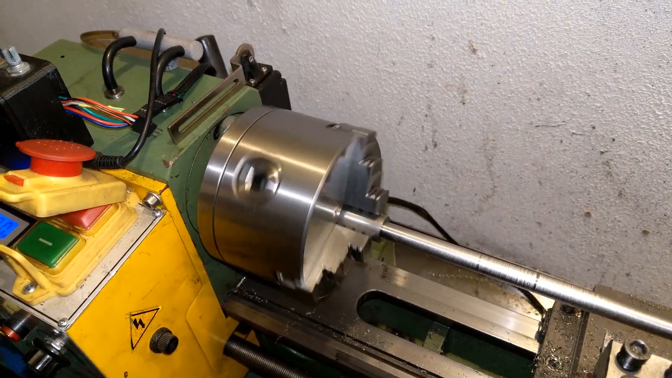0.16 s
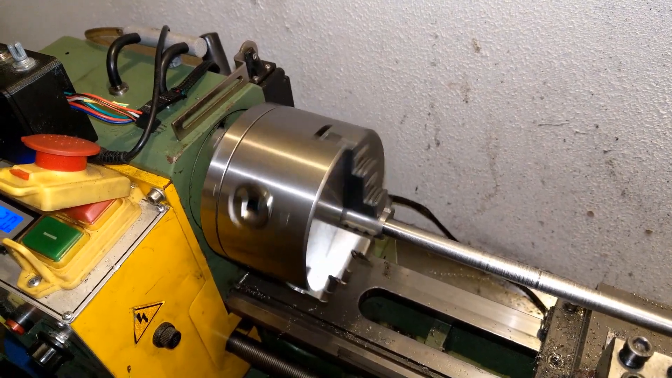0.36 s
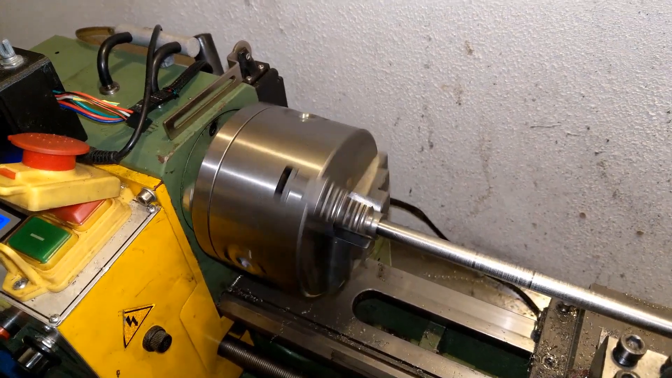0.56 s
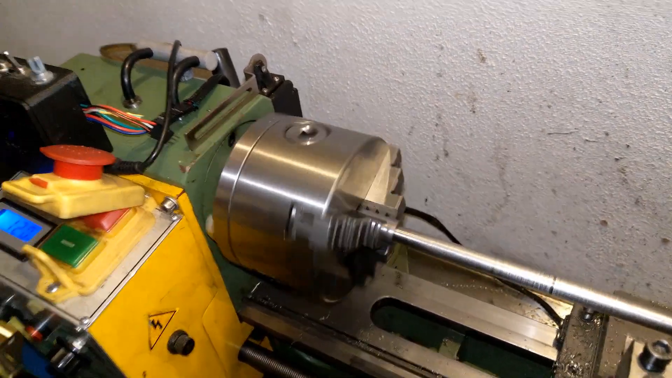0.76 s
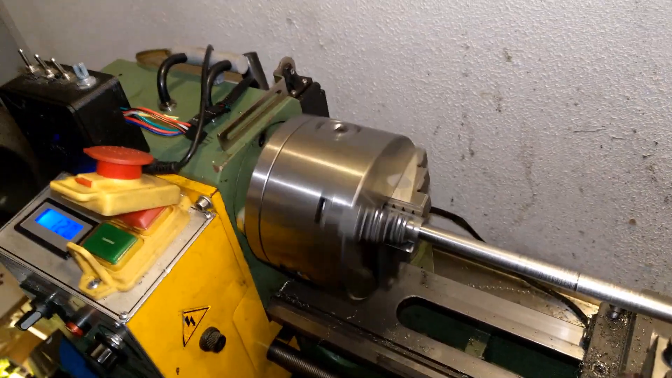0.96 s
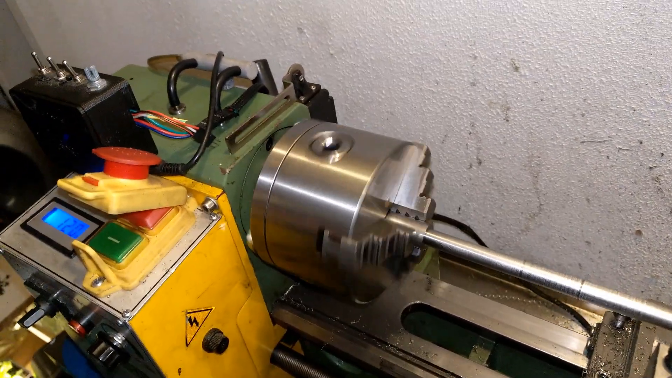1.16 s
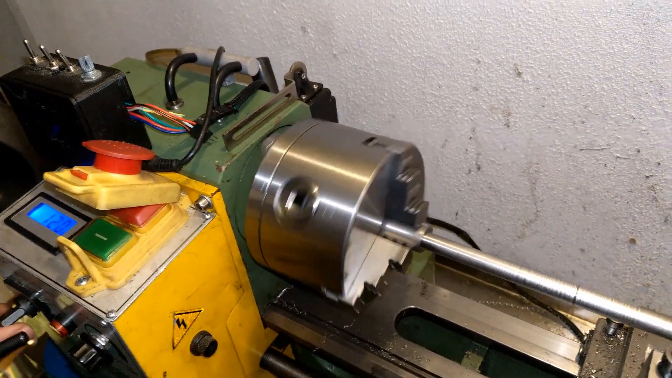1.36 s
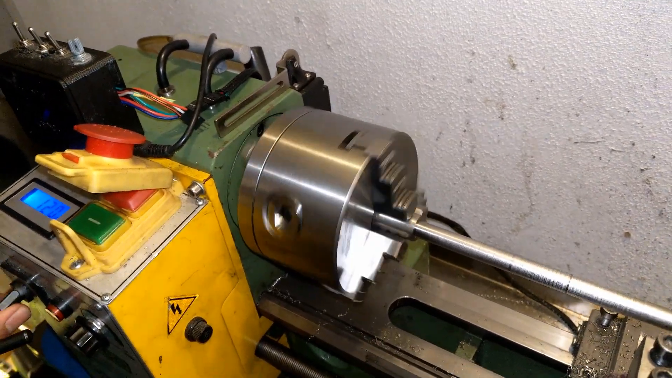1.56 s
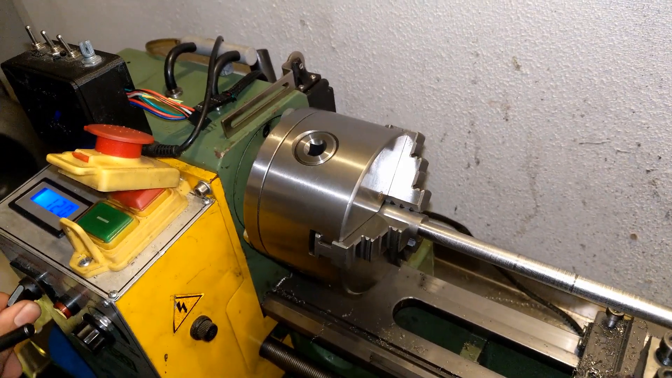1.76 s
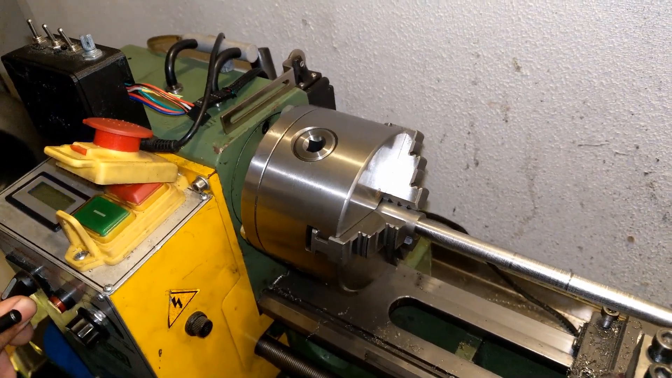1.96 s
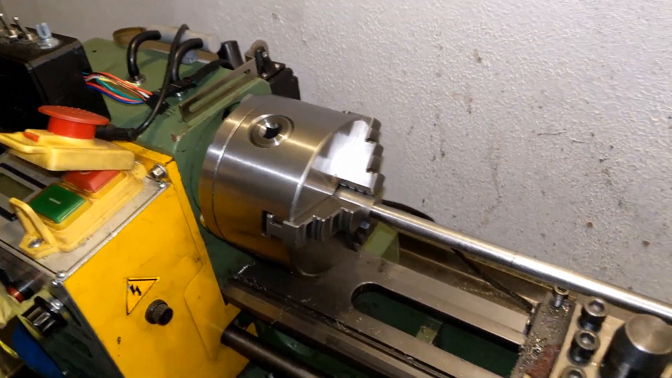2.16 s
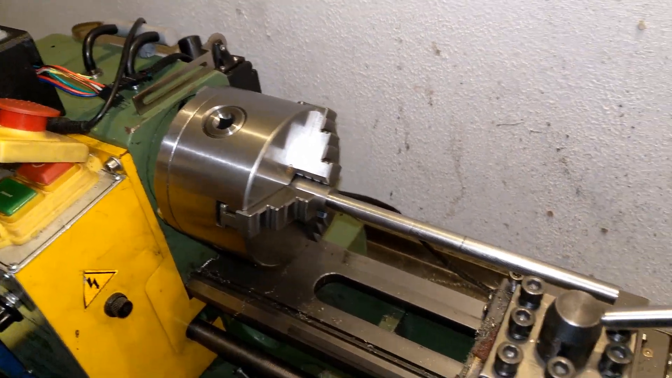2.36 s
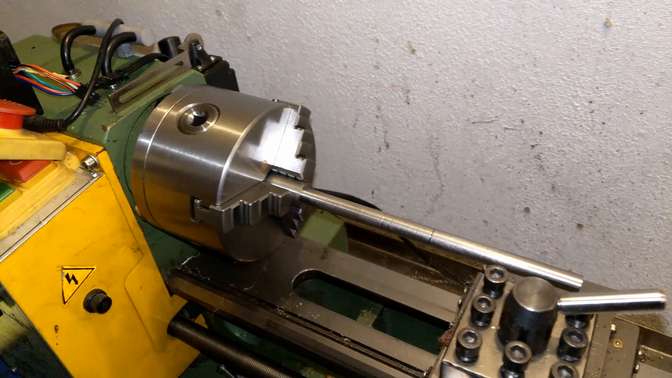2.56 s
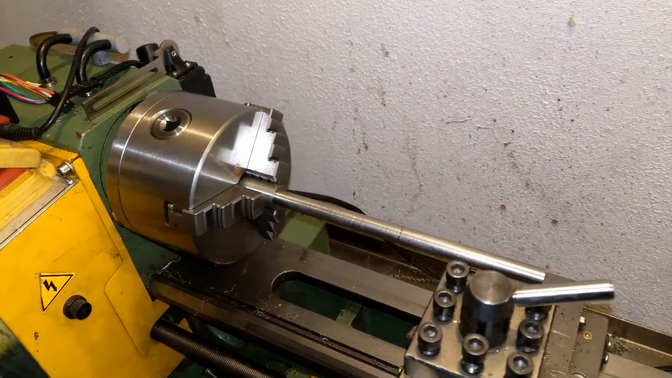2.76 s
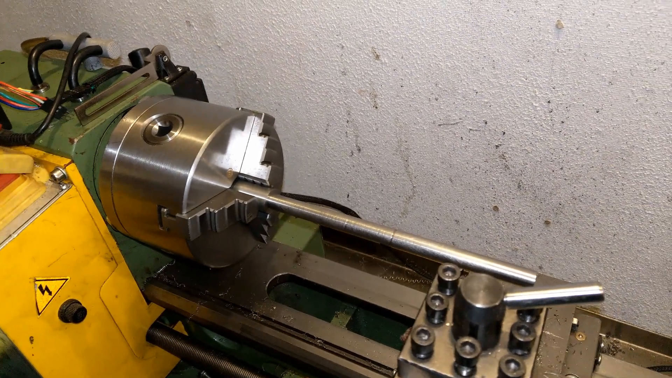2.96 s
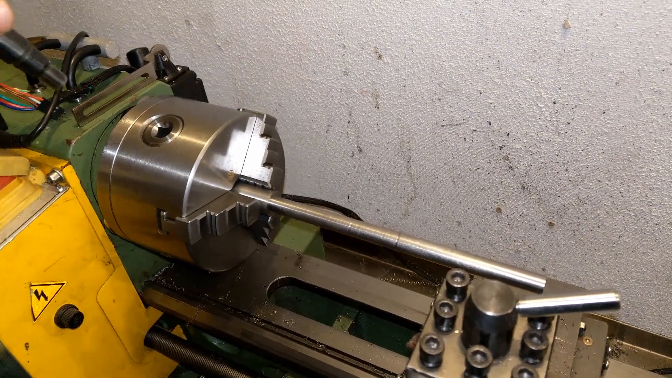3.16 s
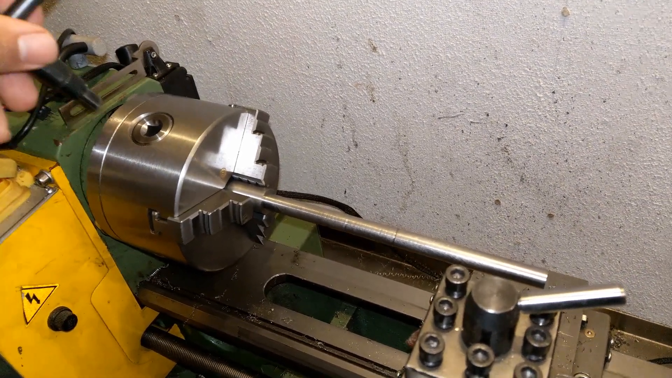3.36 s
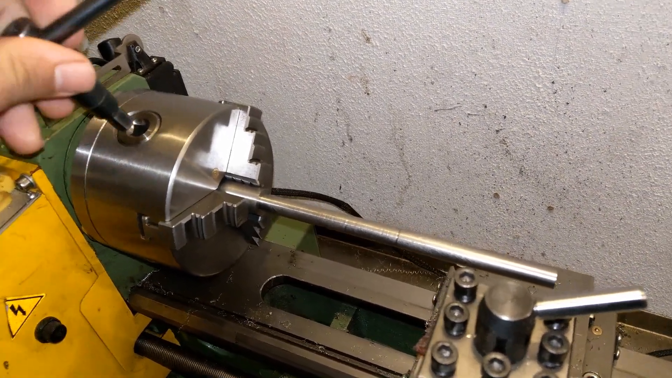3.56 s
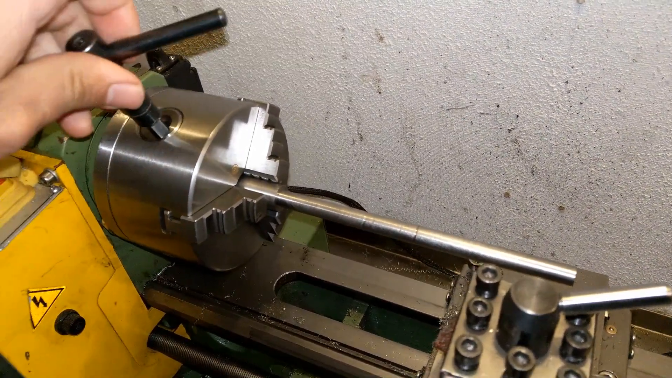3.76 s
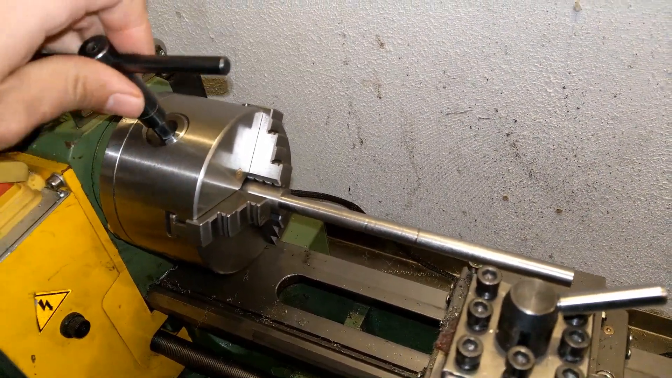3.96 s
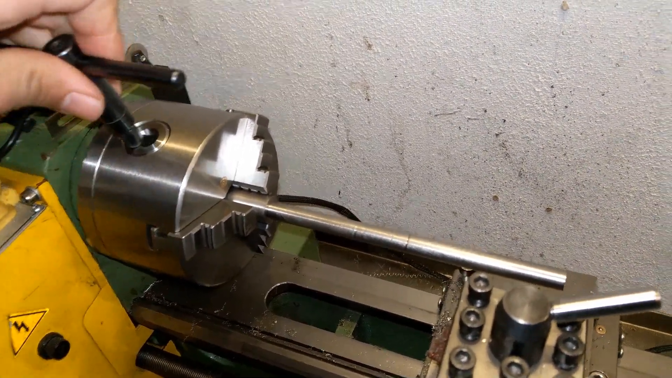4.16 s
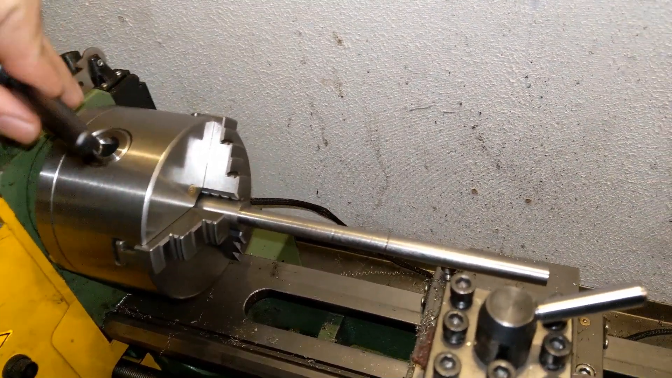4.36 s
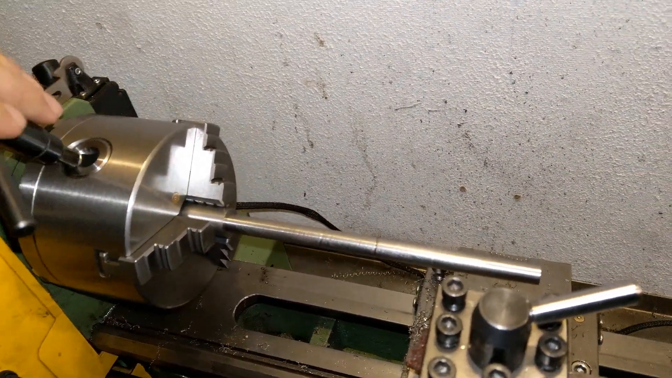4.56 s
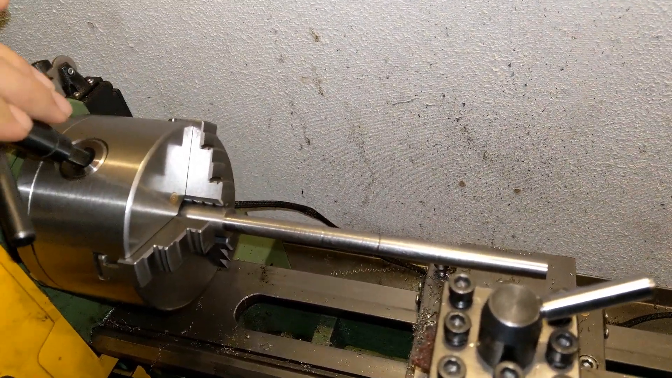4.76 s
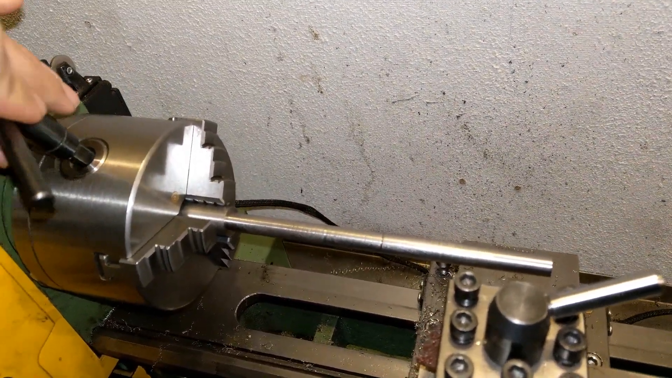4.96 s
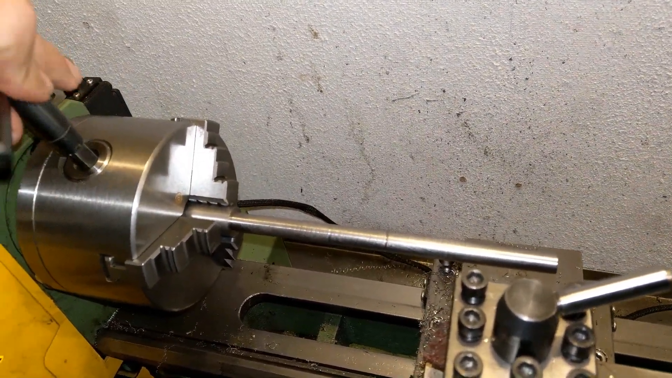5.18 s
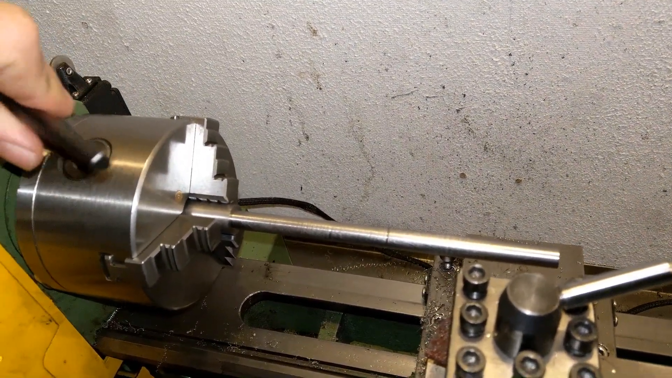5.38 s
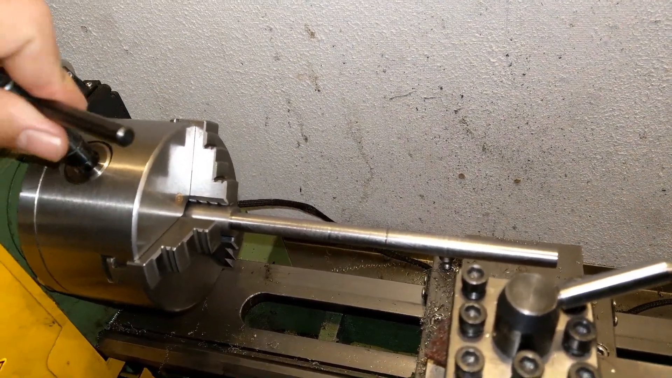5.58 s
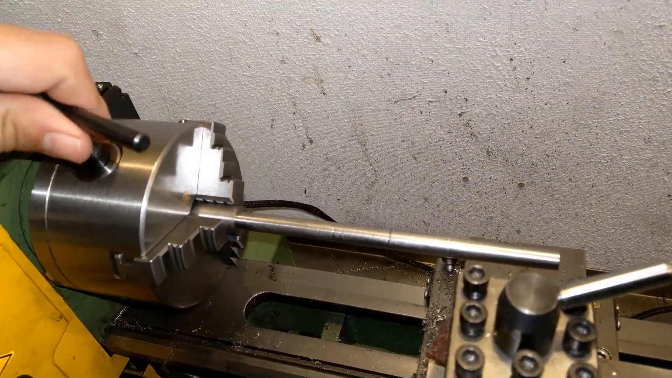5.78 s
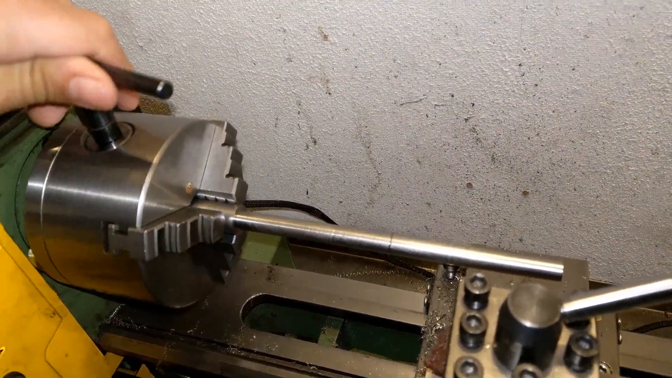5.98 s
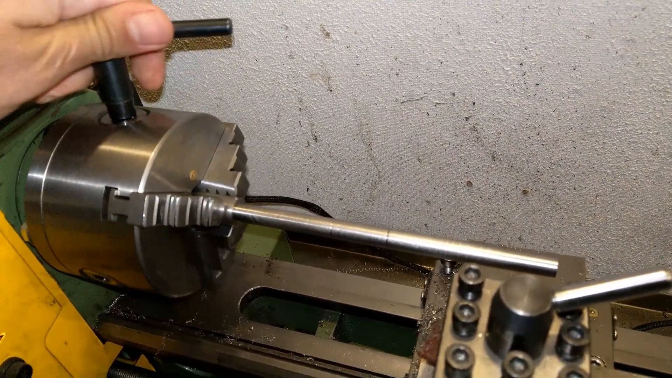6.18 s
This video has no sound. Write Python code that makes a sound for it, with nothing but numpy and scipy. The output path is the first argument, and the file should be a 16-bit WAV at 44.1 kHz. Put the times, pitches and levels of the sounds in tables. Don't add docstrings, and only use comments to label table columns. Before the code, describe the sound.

A small metal lathe runs close by with a low pulsing hum, gear whirr and faint brush hiss, while dull handling bumps jolt the microphone. A loud switch snap cuts the power; the motor sinks away within moments with a hard clack. In the quiet room, with faint fan and hiss, a steel key then ticks, clicks and knocks against the chuck, briefly ringing the heavy machine bed.

```python
import sys
import numpy as np
from scipy import signal
from scipy.fft import rfft, irfft, next_fast_len
from scipy.io import wavfile
from scipy.ndimage import uniform_filter1d, map_coordinates

SR = 44100
rng = np.random.default_rng(int(sys.argv[2]) if len(sys.argv) > 2 else 0)


def gain_from_db(level_db):
    decades = np.asarray(level_db, float) / 20
    return 10 ** decades


def output_pcm(signal):
    pcm = np.clip(np.atleast_2d(signal).T, -1, 1) * 32767
    wavfile.write(sys.argv[1], SR, np.round(pcm).astype(np.int16))


N = 274467

# (frequency [Hz], likeness [-1 to 1])
NEAR_LIKENESS = [(60, 0.78), (180, 0.94), (540, 0.8), (1630, 0.89), (4880, -0.061), (14700, 0.068)]
OFF_S = 1.79
USUAL_DB = -42
TOP_HZ = 14330


def unit(x):
    return x / np.sqrt(np.mean(x ** 2) + 1e-20)


def along(points, hz):
    f, v = np.transpose(points)
    return np.interp(np.log(hz + 1), np.log(f + 1), v)


def curve(points):
    s, v = np.transpose(points)
    return np.interp(np.arange(N) / SR, s, v)


def wobble(rate):
    t = np.arange(0, N + 128, 128) / SR
    knots = rng.standard_normal(400)
    return np.interp(np.arange(N) / SR, t, map_coordinates(knots, [t * min(rate, 60)]))


def filtered(x, response):
    m = next_fast_len(x.shape[-1] + 2048)
    return irfft(rfft(x, m) * response(np.fft.rfftfreq(m, 1 / SR)), m)[..., :x.shape[-1]]


def resonant(modes):
    def response(f):
        total = 0
        for k, (hz, width, db) in enumerate(modes):
            peak = 1j * f * width / (hz * hz - f * f + 1j * f * width)
            total = total + (-1) ** k * gain_from_db(db) * peak
        return total
    return response


def rush(gain, alike, patchy_db):
    z = signal.stft(rng.standard_normal((2, N)), nperseg=512)[2]
    patches = uniform_filter1d(rng.standard_normal(z.shape[1:]), size=5, axis=0)
    patches = uniform_filter1d(patches, size=10, axis=1)
    pair = signal.istft(z * gain_from_db(patchy_db * unit(patches)), nperseg=512)[1][:, :N]

    def mid_and_side(hz):
        turn = np.arccos(np.clip(along(alike, hz), -1, 1)) / 2
        return gain(hz) * np.array([np.cos(turn), np.sin(turn)])
    mid, side = filtered(pair, mid_and_side)
    return unit(np.array([mid + side, mid - side]))


def coloured_rush(points, alike, patchy_db):
    return rush(lambda hz: gain_from_db(along(points, hz)), alike, patchy_db)


def tones(lines, width_hz, sway_db):
    peaks = lambda f: sum(gain_from_db(db) * np.exp(-((f - hz) / width_hz) ** 2) for hz, db in lines)
    total = np.sqrt(sum(gain_from_db(db) ** 2 for hz, db in lines))
    return total * gain_from_db(sway_db * wobble(7.6)) * unit(filtered(rng.standard_normal(N), peaks))


def steady(hz, drift_hz, sway_db):
    phase = 2 * np.pi * np.cumsum(hz + drift_hz * wobble(40)) / SR
    return np.sqrt(2) * gain_from_db(sway_db * wobble(12)) * np.sin(phase)


def cycle(hz, drift_hz):
    return 2 * np.pi * np.cumsum(hz + drift_hz * wobble(13)) / SR


def beat(phase, depth):
    return unit(np.exp(depth * np.cos(phase)))


def ringing(modes):
    return rush(lambda hz: np.abs(resonant(modes)(hz)) ** 2, NEAR_LIKENESS, patchy_db=2.5)


def motor():
    # (time [s], whirr level [dB])
    whirr_course = [
        (0.0, -50),
        (0.5, -52.5),
        (0.56, -46),
        (0.92, -52.5),
        (1.7, -52.5),
        (1.79, -45.5),
        (1.9, -62.5),
        (1.98, -58),
        (2.12, -99),
    ]
    whirr_db = curve(whirr_course + [(2.2, -110)])
    since_off = np.maximum(np.arange(N) / SR - OFF_S, 0)
    sag_hz_per_s = 130
    frame = cycle(np.maximum(82 - sag_hz_per_s * since_off, 30), drift_hz=3.33)
    return (frame_hum(frame, since_off) + running_tones(whirr_db) + casing_whirr(frame, whirr_db)
            + brush_hiss(whirr_db, since_off))


def frame_hum(frame, since_off):
    t = np.arange(N) / SR
    fade_db_per_s, shudder_at_s, shudder_s = 50, 1.845, 0.032
    shudder_db = 15 * np.exp(-((t - shudder_at_s) / shudder_s) ** 2)
    level_db = -40.5 + shudder_db - fade_db_per_s * since_off
    turn_s, dip_s, depth = 0.13, 0.05, 0.42
    dips = 1 - depth * (t < OFF_S) * np.cos(2 * np.pi * (t - dip_s) / turn_s)
    return gain_from_db(level_db - 0.5) * dips * np.sin(frame)


def running_tones(whirr_db):
    # (frequency [Hz], rms level [dB])
    steady_tones = [(150, -61.5), (227, -68), (284, -75), (598, -65.5), (630, -63), (660, -70), (705, -67.5),
                    (829, -68), (861, -65.5), (900, -65.5), (990, -72)]
    bar_note_db = np.minimum(whirr_db, -52) - 11
    bar_note = gain_from_db(bar_note_db) * steady(425, drift_hz=5.04, sway_db=4)
    return gain_from_db(whirr_db + 52) * tones(steady_tones, width_hz=8, sway_db=0.9) + bar_note


def casing_whirr(frame, whirr_db):
    # (frequency [Hz], width [Hz], level [dB])
    casing_modes = [(136, 45, 5), (599, 60, -2.5), (755, 20, -7.5), (880, 82, 1), (986, 37, 2),
                    (1140, 210, -2.5)]
    cover_modes = [(1730, 130, -0.5), (1900, 62, 4), (2130, 180, -3)]
    guard_modes = [(3920, 420, -4), (4676, 620, -1.5), (6556, 810, -6)]
    # (frequency [Hz], level [dB per Hz])
    whirr_colour = [(59, -39), (100, -4), (255, -16.5), (425, -11.5), (526, -41), (638, -9), (1360, -22.5),
                    (1940, -14), (2320, -19), (4610, -29), (6800, -50), (8840, -76), (15000, -120)]
    cover = gain_from_db(-5 + 1.8 * wobble(18)) * beat(frame, depth=1.05) * ringing(cover_modes)
    belt = cycle(75, drift_hz=0.8)
    guard = gain_from_db(-8.5) * beat(belt, depth=0.18) * ringing(guard_modes)
    broad = gain_from_db(0.5) * coloured_rush(whirr_colour, NEAR_LIKENESS, patchy_db=-2.0)
    return gain_from_db(whirr_db - 2.5) * (ringing(casing_modes) + gain_from_db(-1.0) * cover + guard + broad)


def brush_hiss(whirr_db, since_off):
    # (frequency [Hz], level [dB per Hz])
    brush_colour = [(8000, -105), (8900, -17.5), (9380, -9.5), (10800, -3.5), (12300, -9.5), (13700, -8),
                    (14600, -7)]
    follows_whirr, fade_db_per_s = 0.4, 120
    level_db = -56.5 + follows_whirr * (whirr_db + 51.5) - fade_db_per_s * since_off
    bars = cycle(142, drift_hz=1.2)
    ride = gain_from_db(1.3 * wobble(40) + 0.9 * wobble(11)) * beat(bars, depth=0.55)
    return gain_from_db(level_db + 5.5) * ride * coloured_rush(brush_colour, NEAR_LIKENESS, patchy_db=1.5)


def switch():
    # (time [s], peak [dB], hardness [dB], rattle time to fall 60 dB [s])
    snaps = [
        (0.971, -47, -9, 0.036),
        (1.722, -23.5, -6.5, 0.044),
        (1.7842, -36.5, -2, 0.027),
        (1.929, -28, 0, 0.092),
        (2.0499, -52.5, -2.5, 0.079),
    ]
    # (frequency [Hz], width [Hz], level [dB])
    box_parts = [
        [(8800, 470, -9), (10360, 1000, 12.5), (12840, 3300, 5.5)],
        [(1616, 144, -1), (1960, 127, -0.5), (2630, 310, -3.5)],
        [(420, 58, -4), (660, 450, -11), (900, 135, -0.5), (1216, 56, 3), (1463, 86, -3)],
        [(3720, 630, 3.5), (5200, 390, 3), (6240, 690, -5)],
    ]
    return strikes(snaps, box_parts, rise=0.0016, blow=1.5)


def key():
    # (time [s], peak [dB], hardness [dB], rattle time to fall 60 dB [s])
    contacts = [(3.8197, -50.5, -4.5, 0.1), (3.837, -52.5, -6, 0.04), (4.0049, -67, -25, 0.057),
                (4.14, -43, -24, 0.12), (4.2247, -59.5, -11, 0.25), (4.6007, -69, -23, 0.057),
                (4.8429, -52.5, -44, 0.1), (4.8883, -50.5, -25, 0.074), (4.9143, -56.5, 8, 0.084),
                (4.928, -45.5, -6, 0.12), (4.9374, -50.5, -10, 0.13), (4.9471, -43.5, -7.5, 0.082),
                (5.1571, -39.5, -21, 0.14), (5.5403, -39.5, 0.5, 0.089), (5.6086, -59.5, -6.5, 0.14),
                (5.7656, -59, -1, 0.33), (5.7943, -36, 9.5, 0.027), (5.8181, -50.5, 5, 0.09),
                (6.2102, -58, 9, 0.43)]
    # (frequency [Hz], width [Hz], level [dB])
    steel_parts = [
        [(9820, 480, -13.5), (9900, 1900, -14), (10750, 2400, -24)],
        [(1620, 340, -4.5), (2070, 154, 3), (2480, 575, 0), (2940, 490, 0.5)],
        [(330, 126, 1.5), (480, 107, 3.5), (640, 100, -3.6), (824, 98, -3), (1103, 230, -6)],
        [(3770, 430, 3.5), (4780, 220, 2), (5580, 900, -5.5), (7760, 650, -10.5)],
    ]
    return strikes(contacts, steel_parts, rise=0.00061, blow=0.74)


def strikes(events, parts, rise, blow):
    out, t = np.zeros((2, N + SR)), np.arange(SR // 6) / SR
    s, db, bright_db, t60 = np.transpose(events)[:, :, None, None]
    body_db = 0.23 * (USUAL_DB - db)
    upper_db = 0.41 * bright_db
    rattle = gain_from_db(-60 * t / np.maximum(t60, 0.005))
    shape = (blow * gain_from_db(-60 * t / 0.0034) + rattle) * (1 - np.exp(-t / rise))
    shares_db = (bright_db, 0, body_db, upper_db)
    likeness = (0.7, 0.69, 1.0, 0.11)
    total = 0
    for modes, share_db, same in zip(parts, shares_db, likeness):
        left, other = np.moveaxis(rng.standard_normal((len(events), 2, len(t))) * shape, 1, 0)
        right = same * left + np.sqrt(abs(1 - same ** 2)) * other
        ring = filtered(np.stack([left, right], axis=1), resonant(modes))
        ring = ring / np.abs(ring).max(axis=(1, 2), keepdims=True)
        total = total + gain_from_db(db + share_db + 3.5) * ring
    for start, sound in zip(s.ravel(), total):
        out[:, round(start * SR):][:, :len(t)] += sound
    return out[:, :N]


def knocks():
    # (time [s], peak [dB], frequency [Hz], time to fall 60 dB [s])
    knock_notes = [(0.972, -29.5, 440, 0.017), (.972, -34, 900, 0.017), (1.722, -14.5, 954, 0.032),
                   (1.725, -32, 1074, 0.059), (1.933, -28.5, 353, 0.045), (1.934, -31.5, 620, 0.044),
                   (1.936, -28.5, 900, 0.064), (2.149, -68, 2920, .3), (3.823, -45.5, 227, 0.18),
                   (4.005, -54.5, 480, 0.15), (4.143, -34.5, 100, 0.15), (4.142, -44.5, 1627, 0.09),
                   (4.227, -52, 506, 0.34), (4.595, -54.5, 605, 0.17), (4.851, -45, 330, 0.093),
                   (4.949, -36.5, 229, 0.16), (4.955, -40.5, 420, 0.088), (5.156, -30, 101, 0.18),
                   (5.157, -38.5, 209, 0.15), (5.16, -38.5, 1620, 0.062), (5.162, -45, 1900, 0.06),
                   (5.158, -36, 1185, 0.038), (5.549, -36.5, 226.7, 0.31), (5.608, -35.5, 313, 0.15),
                   (5.745, -46, 224, 0.35), (5.799, -39, 235.4, 0.2), (5.8, -39.5, 438, 0.16),
                   (6.0, -52, 624, 0.098)]
    out, t = np.zeros(N + SR), np.arange(SR // 4) / SR
    for s, db, hz, t60 in knock_notes:
        swell_s = 0.033 * t60
        rough_rad = min(1.58 * gain_from_db(0.73 * (USUAL_DB - db)), 2.2)
        bend = rough_rad * np.interp(t, np.linspace(0, 0.25, num=36), rng.standard_normal(36))
        fade = gain_from_db(db + 2.5 - 60 * t / t60) * (1 - np.exp(-t / swell_s))
        out[round(s * SR):][:len(t)] += fade * np.sin(2 * np.pi * hz * t + bend)
    return out[:N]


def ticks():
    # (time [s], peak [dB], high mode [Hz], low mode level [dB], left over right [dB])
    hard_hits = [
        (1.9322, -20.5, 11040, -14, -4),
        (3.8204, -56, 10300, 12, -13),
        (4.9166, -27.5, 9570, -6.5, -2.5),
        (5.543, -41, 9400, -21, -1),
        (5.796, -16, 10740, -8, 0.5),
    ]
    low_hz, rise_s, t60_s = 4050, 0.0005, 0.005
    out, t = np.zeros((2, N + SR)), np.arange(SR // 50) / SR
    for s, db, high_hz, low_db, pan_db in hard_hits:
        high = np.sin(2 * np.pi * high_hz * t + [[0], [1.2]])
        low = gain_from_db(low_db) * np.sin(2 * np.pi * low_hz * t)
        fade = gain_from_db(db + 5.5 - 60 * t / t60_s + pan_db * np.array([[0.5], [-0.5]]))
        out[:, round(s * SR):][:, :len(t)] += fade * (1 - np.exp(-t / rise_s)) * (high + low)
    return out[:, :N]


def bumps():
    # (time [s], peak [dB], pitch [Hz])
    jolts = [(0.364, -24.5, 39.3), (.443, -18.5, 84), (0.486, -23, 56), (0.533, -11.5, 57.6),
             (0.619, -15, 54), (0.667, -20.5, 46), (0.696, -49, 50), (0.847, -29, 40.4),
             (0.957, -23.5, 40.3), (0.984, -28.5, 45.4), (2.001, -31.5, 46), (4.474, -41, 66.5),
             (5.998, -36, 55.4), (6.053, -33, 75.5), (6.141, -45, 50.5)]
    out, t = np.zeros(N + SR), np.arange(SR // 8) / SR
    onset = 1 - np.exp(-(t / 0.00084) ** 2)
    for s, db, hz in jolts:
        sinking = 2 * np.pi * hz * 1.33 * t * np.exp(-t * 18)
        swing = -np.sin(sinking) * np.exp(-t * hz * 1.93)
        out[round((s - 0.003) * SR):][:len(t)] += gain_from_db(db - 1.0) * swing * onset
    return out[:N] * gain_from_db([[-0.9], [0.9]])


def walls(x):
    # (frequency [Hz], time to fall 60 dB [s])
    echo_times = [(200, 0.058), (2000, 0.11), (10000, 0.083)]
    hz, t, z = signal.stft(rng.standard_normal((2, SR // 2)), SR, nperseg=256)
    dying = gain_from_db(-60 * t / along(echo_times, hz)[:, None])
    tail = signal.istft(z * dying, SR, nperseg=256)[1]
    return signal.fftconvolve(x, tail / np.linalg.norm(tail[0]), axes=1)[:, :N]


def workshop():
    # (time [s], level over rest [dB])
    hands = [(0.0, 0), (0.31, 4), (0.42, 15.5), (0.8, 16), (1.2, 6.5), (1.8, 12), (2.1, 3.5), (3.7, 0.5),
             (4.25, 3.5), (4.76, 1), (5.0, 4.5), (5.5, 6), (6.1, 9)]
    # (frequency [Hz], level [dB per Hz])
    air_colour = [(65, -49), (110, 1), (141, -6.5), (242, -6.5), (267, -13.5), (393, -8.5), (763, -12),
                  (965, -13), (1110, -16), (1200, -15), (1500, -17), (3000, -21), (3900, -37.5),
                  (6600, -120)]
    rumble_colour = [(12, -2.5), (20, -0.5), (48, -5.5), (81, -3), (90, -2.5), (97, -23.5), (130, -22),
                     (170, -84), (290, -120)]
    hiss_colour = [(1500, -17), (2500, -41), (3400, -2), (5200, -4.5), (6500, -7.5), (8300, -11),
                   (9500, -7), (13400, -6), (14400, -17)]
    # (frequency [Hz], likeness [-1 to 1])
    room_likeness = [(60, 0.94), (180, 0.79), (540, 0.57), (1630, 0.42), (4880, 0.13), (14700, 0.01)]
    # (frequency [Hz], rms level [dB])
    fan_tones = [(73, -78), (146, -77), (307, -78), (393, -97), (660, -79.5), (958, -80.5), (1750, -85.5)]
    # (time [s], rms level [dB])
    whine_fade = [(3.1, -75), (3.5, -79.5)]
    busy_db = curve(hands)
    air_db = -68 + 0.74 * busy_db
    air = gain_from_db(air_db + 2.5) * coloured_rush(air_colour, room_likeness, patchy_db=1.3)
    hiss = gain_from_db(-73.5) * coloured_rush(hiss_colour, room_likeness, patchy_db=3.2)
    rumble_db = -61 + busy_db + 5 + 1.57 * wobble(3.22)
    rumble = gain_from_db(rumble_db) * coloured_rush(rumble_colour, [(30, 0.96)], patchy_db=0.3)
    whine = gain_from_db(curve(whine_fade)) * steady(1232, drift_hz=8.8, sway_db=2.5)
    fan = tones(fan_tones, width_hz=12, sway_db=0.6)
    return air + hiss + rumble + whine + fan


def scene():
    # (frequency [Hz], level [dB])
    near_colour = [(20, -1), (6000, 1), (7000, -3.5), (7800, -3.5), (8500, -40), (9000, -0.5), (14000, -8)]
    hits = switch() + key() + knocks() + ticks()
    sources = hits + gain_from_db(-8) * walls(hits) + motor()
    heard = filtered(sources, lambda hz: gain_from_db(along(near_colour, hz)))
    return heard + bumps() + workshop()


def thin_and_grain(x, grain_db):
    # (frequency [Hz], level [dB])
    survival = [(4500, -33.5), (5500, -9.5), (6900, -12), (7400, -14), (8600, -11), (9300, -22),
                (14000, -20)]
    hz, _, z = signal.stft(x, SR, window="cosine", nperseg=2048)
    power = np.abs(z) ** 2
    band = np.repeat(power[:, :1024].reshape(2, 128, 8, -1).mean(axis=2), 8, axis=1)
    band = np.concatenate([band, band[:, -1:]], axis=1)
    loudness = power[:, (hz > 450) & (hz < TOP_HZ)].mean(axis=1, keepdims=True)
    over_db = 10 * np.log10(band / loudness + 1e-12) - along(survival, hz)[:, None]
    whim = np.kron(rng.standard_normal((129, z.shape[2] // 2 + 1)), np.ones((8, 2)))
    over_db = over_db + 3 * whim[:len(hz), :z.shape[2]]
    survives = 1 / (1 + gain_from_db(np.clip(-20 * over_db, -99, 99)))
    kept = np.where(hz[:, None] > 4500, survives, 1)
    grain = signal.stft(rng.standard_normal(x.shape), SR, window="cosine", nperseg=2048)[2]
    share = gain_from_db(along(grain_db, hz)[:, None]) * np.sqrt(band / np.mean(np.abs(grain) ** 2))
    return signal.istft(kept * (z + share * grain), SR, window="cosine", nperseg=2048)[1][:, :N]


def top_cut(x):
    return signal.sosfilt(signal.butter(12, 15270, fs=SR, output="sos"), x)


def record(dry):
    limited = filtered(dry, lambda hz: hz < TOP_HZ)
    mix = thin_and_grain(limited, grain_db=[(200, -39), (1000, -14), (4000, -9.5), (10000, -3.0)])
    return top_cut(mix)


dry = scene()
out = record(dry)
output_pcm(out)
```